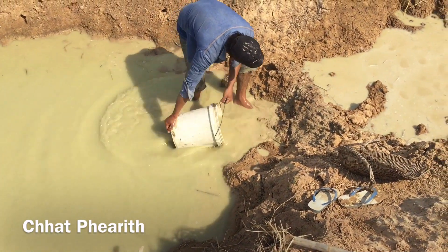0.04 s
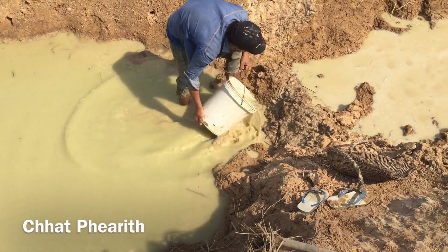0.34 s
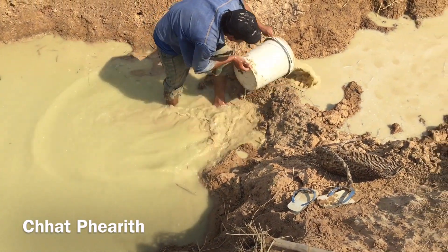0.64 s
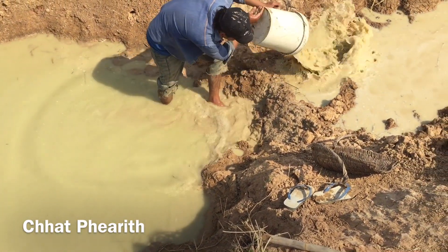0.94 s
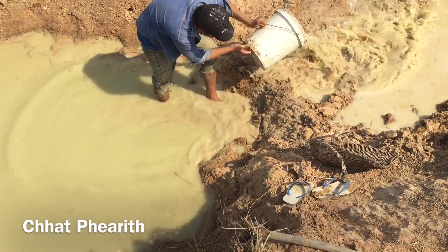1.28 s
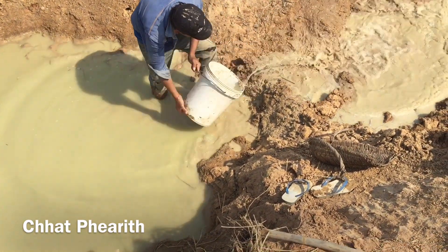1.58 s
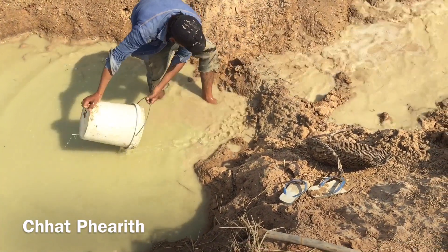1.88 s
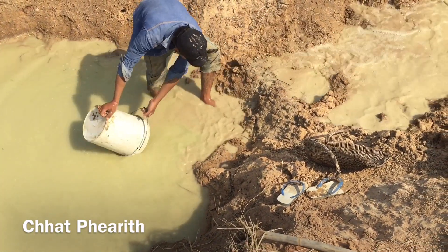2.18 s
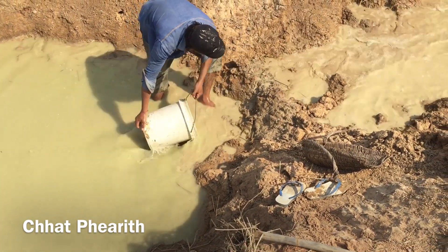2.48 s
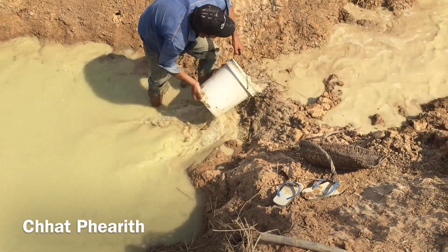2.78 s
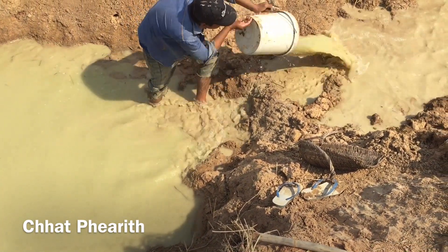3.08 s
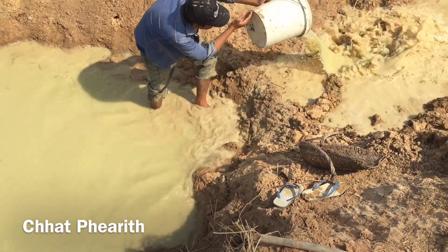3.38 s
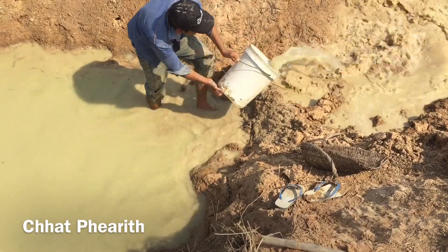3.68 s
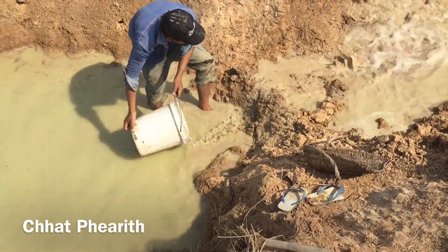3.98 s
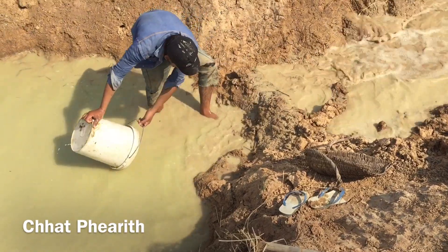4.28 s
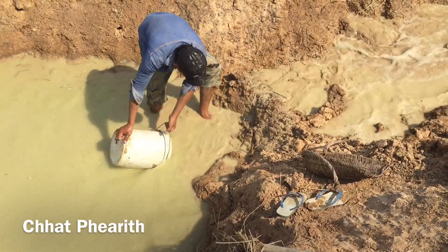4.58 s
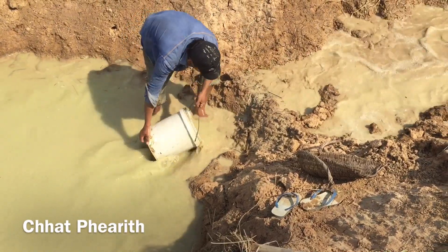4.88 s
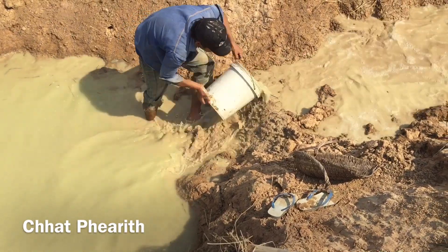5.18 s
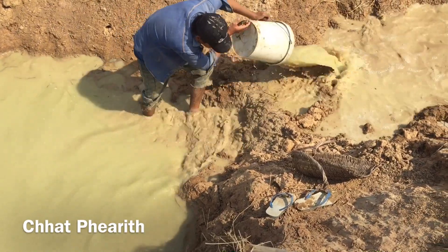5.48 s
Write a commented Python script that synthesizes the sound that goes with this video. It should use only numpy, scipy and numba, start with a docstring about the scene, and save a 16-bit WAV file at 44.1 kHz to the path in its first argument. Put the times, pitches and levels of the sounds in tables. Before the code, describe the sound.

A plastic bucket slaps into shallow muddy water with a knock right at the start and fills with a hollow, gulping slosh. At about 0.8 seconds the load is flung over a bank and lands in two quick splashes, a deep gurgle with slosh and spray that thins to a dribble by 2 seconds. Near 2.4 seconds the bucket knocks in again with a low gulp of trapped air and fills. The second load splashes down from 3 to 3.6 seconds, followed by small slaps and dribbles. A third scoop sloshes from about 4.6 to 5.3 seconds, and its load lands around 5.5 seconds, at the very end. Drips and small waves continue throughout, with a short, weak echo from the earth banks. Behind it all, light wind bumps and rumbles softly on the microphone over faint outdoor air.

```python
"""Muddy water sloshes and splashes as a plastic bucket bails a shallow pond, three times over.
The bucket slaps in and fills with hollow gulps of air; its wall knocks on the first and second dips.
Each load is flung over a bank and lands as a cloud of ringing bubbles (deep gurgle, slosh and
spray) that thins to a dribble. Drips fall throughout and the banks return a short echo.
Behind it all, light wind nudges the microphone over faint outdoor air."""
import sys
import numpy as np
from scipy import signal
from scipy.fft import rfft, irfft
from scipy.io import wavfile
from scipy.ndimage import uniform_filter1d
from numba import njit

SR = 44100
rng = np.random.default_rng(int(sys.argv[2]) if len(sys.argv) > 2 else 0)


def materialize(psi):
    """Save the field psi as 16-bit PCM at rate SR to the path in sys.argv[1].

    A 1-D psi becomes a single channel; in a 2-D psi each row is a channel.
    """
    bounded = np.clip(np.atleast_2d(psi).T, -1, 1)
    quanta = np.round(bounded * 32767).astype(np.int16)
    wavfile.write(sys.argv[1], SR, quanta)


N = 253134
T = np.arange(N) / SR

# Loads landing beyond the bank; the first comes down in two. Each row: start in seconds, rise in
# seconds, hold in seconds, level in dB, gurgle in dB against that level.
LOADS = [(.775, .075, .11, -41, -2), (1.06, .1, .17, -42.5, -7), (3.02, .31, .19, -40.5, -1.5),
         (5.35, .32, .1, -39.5, -3)]
# The bucket filling. Each row: start and end in seconds, level in dB, brightness in dB, share of
# the slosh that runs into the hollow from 0 to 1.
FILLS = [(-.02, 0.711, -55, -1.17, 0.75), (2.357, 2.93, -50.5, 0.86, 0.77), (4.591, 5.28, -51, -1, 0.66)]
# Short waves pushed by the bucket and dribbles shaken from it. Each row: start in seconds, time to
# the peak in seconds, level in dB, brightness in dB.
WAVELETS = [(.378, .055, -49.5, -3), (.52, .09, -50, -1), (.67, .08, -55, 5.5), (1.70, .08, -63, 9),
            (1.96, .035, -66, 3.5), (2.17, .06, -56, -3.5), (2.635, .11, -58, 11), (3.79, .1, -52.5, 6),
            (4.25, .08, -65, 4), (4.43, .06, -67, 2), (4.53, .075, -55.5, -4), (4.605, .03, -49.5, 0),
            (4.853, .043, -50, 3.5), (5.14, .05, -43, 0)]
# The tone of the bubble clouds. Each row: frequency in Hz, gain in dB.
BUBBLE_EQ = [(220, -1.5), (320, -3), (420, -1), (550, -5), (700, -2.5), (950, -1), (1300, -1), (2400, 0.5),
             (3500, 2), (4500, 1), (6500, 0.5), (8000, 3.5), (9800, -5.5)]
# The hollow tone inside the bucket. Each row: frequency in Hz, gain in dB.
HOLLOW_EQ = [(600, 5.5), (740, 8.5), (900, 0), (1080, -6), (1450, -4), (1750, 9.5), (1930, -1),
             (2150, -2.5), (2450, -6.5)]
# The bucket's first knock (two rows), then ringing air pockets and drips. Each row: start in
# seconds, pitch in Hz, peak in dB, cycles to the peak.
RINGS = [(.0675, 1674, -30.5, 4.9), (.071, 774, -34, 1.8), (.11, 327, -46, 2.5), (.433, 183, -40, 1.2),
         (.899, 329, -44, 4.8), (.934, 292, -36, 2.4), (.972, 161, -41.5, 1.5), (1.034, 388, -37.5, 2.1),
         (2.3, 1560, -46, 4.2), (2.492, 616, -41.5, 3.9), (2.5495, 2450, -37.5, 2.4),
         (2.614, 1590, -38.5, 5.2), (3.069, 333, -29.5, 0.38), (3.244, 273, -32.5, 1.3),
         (3.268, 320, -30.5, 2.5), (3.344, 302, -28.5, 2.8), (3.869, 334, -38, 0.48),
         (4.038, 1294, -45, 3.7), (4.249, 318, -51, 1.1), (4.652, 3700, -31, 1.4),
         (4.688, 150.5, -40.5, 1.6), (4.730, 650, -29.5, 1.3), (4.744, 386, -38, 2.3),
         (4.971, 3700, -27, 2.8), (5.030, 303, -29.5, 0.8), (5.062, 680, -35, 1.6), (5.147, 1940, -31, 1.8),
         (5.235, 300, -37.5, .9), (5.564, 339, -28.5, 0.94), (5.588, 340, -35.5, 2), (5.656, 316, -32, 2.2),
         (5.675, 315, -27, 1.3), (5.68, 205, -33.5, 1.4)]
# Air caught under the bucket on its second dip. Each row: pitch in Hz, peak in dB, time to the peak
# in seconds, climb in octaves over five times that time.
PLUNGE_GULPS = [(158, -26, .011, 0.086), (207, -27, 0.014, .01)]
# Slaps and falling dollops. Each row: start in seconds, level in dB, band centre in Hz, time to the
# peak in seconds.
WATER_SLAPS = [(0.0652, -38.5, 2510, 0.0035), (0.1144, -42, 1920, 0.0027), (0.3448, -42.5, 3530, 0.00099),
               (0.451, -43, 4860, 0.0045), (.537, -36.5, 3750, 0.00053), (1.826, -41, 3740, 0.0017),
               (2.389, -45, 2780, 0.0091), (2.882, -40, 1800, 0.0063), (3.349, -32.5, 790, 0.0077),
               (3.866, -36, 3000, 0.0016), (3.909, -36, 1600, 0.002), (3.921, -30.5, 2400, 0.00061),
               (3.993, -39.5, 4500, .003), (4.335, -48.5, 3120, .0013), (4.442, -51.5, 3670, 0.0068),
               (4.518, -42.5, 3200, 0.00027), (4.554, -49, 3400, 0.0018), (4.623, -39, 2000, 0.0038),
               (4.729, -44.5, 830, 0.0032), (5.128, -32.5, 3650, 0.00059), (5.146, -27, 1940, .0006),
               (5.172, -32.5, 4480, 0.0021), (5.177, -34.5, 1510, 0.0049)]
# The wall's second knock. Each row: pitch in Hz, relative level in dB, seconds to fall by 60 dB.
WALL_MODES = [(755, 1.5, 0.081), (960, 6, 0.024), (1100, -3, 0.044), (1480, -6, .03), (1860, -17, 0.084),
              (3280, -9, 0.051)]
# The wind's push on the microphone. Each row: time in seconds, level in dB before gusts.
WIND_LEVELS = [(0.0, -67), (0.1, -59), (0.25, -74), (0.65, -78), (1.2, -68), (1.38, -54), (1.55, -62),
               (2.2, -62), (2.75, -59.5), (3.15, -52.5), (3.7, -56), (4.3, -54), (4.7, -60), (4.85, -61.5),
               (5.25, -62.5), (5.5, -49), (5.74, -55.5)]
# The strongest soft bumps of air. Each row: start in seconds, pitch in Hz, peak in dB.
BUFFETS = [(1.341, 105, -35.5), (1.562, 182, -43), (1.743, 163, -37.5), (1.995, 119, -42),
           (2.016, 146, -38.5), (2.326, 97, -38.5), (2.888, 129, -36), (3.118, 107, -33),
           (3.391, 76.5, -38), (3.545, 70.4, -35), (3.841, 98, -33.5), (4.1, 92, -37), (4.246, 171, -40),
           (4.286, 100, -37), (4.32, 112, -36.5), (4.515, 186, -38.5), (5.503, 103, -31.5)]
# The tone of the wind, then of still air. Each row: frequency in Hz, relative level in dB.
RUMBLE_EQ = [(15, -41), (35, -6.5), (60, 8.5), (100, 2.5), (180, -7), (300, -19.5), (600, -52.5),
             (2000, -75)]
AIR_EQ = [(30, 8), (200, 20), (500, -9), (2000, 6), (6000, -13), (10000, -21.5)]
# A resonance and notches that colour the whole mix. Each row: centre in Hz, width in Hz, gain in dB.
MIC_EQ = [(1070, 93, -3), (1630, 375, -4.5), (1984, 334, 3.5), (4890, 280, -3.5), (7780, 1170, -5.5)]

# Every trio runs gurgle, slosh, spray: the three sizes of bubble in moving water.
POUR_RISE_POWER = (1.3, .6, .6)  # slosh and spray arrive ahead of the bulk
POUR_FALL_DB_PER_S = (44, 43, 34)
FILL_BALANCE_DB, FILL_TREND_DB_PER_S = (-2.5, 0, -0.97), (-9, -4, 2)
TRICKLE_DB = (-80, -73, -74)  # water that never stops running off the bank

SECOND_KNOCK_S, PLUNGE_S = 2.3885, 2.395
DRIPS_PER_S, DRIP_HZ, DRIP_DB = 5.4, (910, 5040), -55.5
GULPS_PER_S, GULP_HZ, GULP_OVER_FILL_DB = 12, (1090, 4800), 2.5
PUFFS_PER_S, PUFF_HZ, PUFF_OVER_WIND_DB = 8, (55, 240), 7


def water(lap_db=0.66, deep_lap_db=1.63):
    """Big, middling and tiny bubbles ring in unevenly lapping water, clumping as each sheet breaks up."""
    gurgle_db, slosh_db, spray_db = stirring() + lap_db * drift(hz=14)
    gurgle_db = gurgle_db + deep_lap_db * drift(hz=7)
    clumps_db = drift(hz=53)
    gurgle = cloud(gurgle_db, 223, 667, spread_db=6, cycles=1.86, rise=0.047, froth=0.33, count=1500)
    slosh = cloud(slosh_db, 641.6, 2430, spread_db=2.5, cycles=2.3, rise=0.047, froth=0.7, count=4500)
    spray = cloud(spray_db, 2530, 9120, spread_db=4.5, cycles=2.9, rise=0.022, froth=1.39, count=16000)
    gurgle = steadied(gurgle) * gain_of(gurgle_db + 1.6)
    slosh = steadied(in_bucket(slosh) * gain_of(0.94 * clumps_db)) * gain_of(slosh_db + 0.57)
    spray = steadied(spray * gain_of(clumps_db)) * gain_of(spray_db + 0.92)
    return gurgle + slosh + spray


def stirring():
    """Envelopes in dB for gurgle, slosh and spray: all movements of the water add in power."""
    moves = [pour(*row) for row in LOADS]
    moves += [fill(*row[:-1]) for row in FILLS]
    moves += [swash(*row) for row in WAVELETS]
    power = sum(np.square(move) for move in moves)
    return 10 * np.log10(power + gain_of(TRICKLE_DB)[:, None] ** 2)


def pour(start, rise_s, hold_s, db, gurgle_db):
    """A load lands, keeps coming, then runs off; the gurgle fades as soon as the bulk is down."""
    landed = np.clip((T - start) / rise_s, 1e-9, 1)
    layers = zip((db + gurgle_db, db, db), (0, hold_s, hold_s), POUR_RISE_POWER, POUR_FALL_DB_PER_S)
    return [landed ** power * gain_of(level - fall * np.maximum(T - start - rise_s - held, 0))
            for level, held, power, fall in layers]


def fill(start, end, db, bright_db, attack_s=.05, fall_db_per_s=65):
    """Water runs into the bucket, gurgle fading and spray growing, until it is lifted clear."""
    attack = np.clip((T - start) / attack_s, 0, 1)
    envelope = attack * gain_of(db - fall_db_per_s * np.maximum(T - end, 0))
    from_middle = np.clip(T, start, end) - (start + end) / 2
    layers = zip(FILL_BALANCE_DB, (-bright_db, 0, bright_db), FILL_TREND_DB_PER_S)
    return [envelope * gain_of(level + tilt + trend * from_middle) for level, tilt, trend in layers]


def swash(start, peak_s, db, bright_db, gurgle_db=-10):
    """A small wave swells and subsides."""
    u = np.maximum(T - start, 0) / peak_s
    envelope = (u * np.exp(1 - u)) ** 2
    return [envelope * gain_of(db + tilt) for tilt in (gurgle_db - bright_db, 0, bright_db)]


def cloud(level_db, lo_hz, hi_hz, spread_db, cycles, rise, froth, count):
    """A band of bubbles; harder stirring makes more and whips up a froth of countless tiny ones."""
    stir = gain_of(level_db - level_db.max())
    birth_rate = stir ** .4
    when, pitch, strength, damping, lift, sign = rng.random((count, 6)).T
    starts = np.minimum(np.searchsorted(np.cumsum(birth_rate), when * birth_rate.sum()), N - 1)
    hz = lo_hz * (hi_hz / lo_hz) ** pitch
    accent_db = spread_db * np.minimum(-np.log(1 - strength), 4)
    # Small bubbles die sooner, so the root of the pitch gives all sizes a like energy.
    gains = gain_of(accent_db) * np.sqrt(hz) * np.sign(sign - .5)
    rings = bubbles(starts, hz, cycles * 2 ** (2 * damping - 1), rise * lift, gains)
    f = np.fft.rfftfreq(N, 1 / SR) + 1
    pink_band = 1 / np.sqrt(f * (1 + (lo_hz / f) ** 12) * (1 + (f / hi_hz) ** 12))
    foam = unit_rms(irfft(rfft(rng.standard_normal(N)) * pink_band, N))
    return equalised(unit_rms(rings / np.sqrt(birth_rate)) + froth * stir ** 0.16 * foam, BUBBLE_EQ)


@njit
def bubbles(starts, hz, cycles, rise, gains):
    """Each freshly closed bubble is a dying sine whose pitch climbs as it nears the surface."""
    out = np.zeros(N)
    for k in range(len(starts)):
        life = cycles[k] * SR / hz[k]
        fade, step = 1., np.exp(-1 / life)
        for i in range(min(int(5 * life), N - starts[k])):
            u = i / life
            turns = cycles[k] * u * (1 + rise[k] * u / 2)
            out[starts[k] + i] += gains[k] * fade * (1 - fade * fade) * np.sin(2 * np.pi * turns)
            fade *= step
    return out


def in_bucket(x):
    """Water that runs into the bucket takes on its hollow colour."""
    inside = sum(share * ((T > start) & (T < end)) for start, end, _, _, share in FILLS)
    inside = uniform_filter1d(inside, size=2500)
    return (1 - inside) * x + inside * equalised(x, HOLLOW_EQ)


def first_knock_and_pockets(climb_octaves=.35, full_climb_below_hz=400):
    """The bucket's first knock, trapped air pockets and drips all ring; high pitches climb less."""
    out = np.zeros(N)
    rows = list(RINGS) + strays(0, T[-1], DRIPS_PER_S, DRIP_HZ, DRIP_DB)
    for start, end, db, _, _ in FILLS:
        rows += strays(start, end, GULPS_PER_S, GULP_HZ, db + GULP_OVER_FILL_DB)
    for start, hz, db, cycles in rows:
        octaves = climb_octaves * min(full_climb_below_hz / hz, 1)
        add(out, start, rising_ring(hz, db, cycles / hz, octaves))
    for row in PLUNGE_GULPS:
        add(out, PLUNGE_S, rising_ring(*row))
    return out


def rising_ring(hz, db, peak_s, octaves):
    """One resonance swells and dies while its pitch climbs."""
    u, envelope = swell(peak_s)
    turns = np.cumsum(hz * 2 ** (octaves * u / 5)) / SR
    return gain_of(db) * envelope * np.sin(2 * np.pi * turns)


def slaps(width_octaves=0.68, samples=2 ** 13):
    """Flat lumps of water land, each a short, broad burst of noise."""
    out = np.zeros(N)
    f = np.fft.rfftfreq(samples, 1 / SR)
    for start, db, hz, peak_s in WATER_SLAPS:
        _, envelope = swell(peak_s)
        band = 1 / (1 + (np.log2((f + 1) / hz) / width_octaves) ** 2)
        burst = steadied(irfft(rfft(rng.standard_normal(samples)) * band), window=120)
        add(out, start, gain_of(db) * envelope * np.resize(burst, len(envelope)))
    return out


def second_knock(gain_db=-33, contact_s=0.00091):
    """The plastic wall meets the surface, rings, and is quickly damped by the water."""
    t, out = T[:SR // 4], np.zeros(N)
    ring = sum(gain_of(db - 60 * t / t60) * np.sin(2 * np.pi * hz * t) for hz, db, t60 in WALL_MODES)
    add(out, SECOND_KNOCK_S, gain_of(gain_db) * ring * (1 - np.exp(-t / contact_s)))
    return out


def banks(x, t60=.13, echo_db=-12, taps_per_s=2000, predelay_s=.004):
    """The earth banks scatter a short, weak echo."""
    t = T[:SR // 5]
    taps = rng.standard_normal(len(t)) * (rng.random(len(t)) < taps_per_s / SR)
    taps *= (t > predelay_s) * gain_of(-60 * t / t60)
    return x + gain_of(echo_db) * signal.oaconvolve(x, taps / np.linalg.norm(taps))[:N]


def wind(lump_db=3.3, gust_db=3, trim_db=0.8, bump_cycles=0.6):
    """Wind on the microphone: a lumpy, gusting rumble with soft buffets and lesser random puffs."""
    lumpy_noise = rng.standard_normal(N) * gain_of(lump_db * drift(hz=28))
    rumble = steadied(equalised(lumpy_noise, RUMBLE_EQ), window=3000)
    strength_db = np.interp(T, *np.transpose(WIND_LEVELS))
    out = rumble * gain_of(strength_db + trim_db + gust_db * drift(hz=8.9))
    puffs = [(start, hz, db + np.interp(start, T, strength_db))
             for start, hz, db, _ in strays(0, T[-1], PUFFS_PER_S, PUFF_HZ, PUFF_OVER_WIND_DB)]
    for start, hz, db in list(BUFFETS) + puffs:
        u, envelope = swell(bump_cycles / hz)
        tone = np.sin(2 * np.pi * (bump_cycles * u + rng.random()))
        add(out, start, gain_of(db) * envelope ** 2 * tone)
    return out


def outdoor_air(db=-68):
    """A faint, steady bed of still air."""
    return gain_of(db) * unit_rms(equalised(rng.standard_normal(N), AIR_EQ))


def strays(start, end, per_s, hz_range, floor_db, spread_db=6, cycles=2.4):
    """Small events at random moments between start and end, in rows like those of RINGS."""
    lo_hz, hi_hz = hz_range
    waits, pitches, sizes = rng.random((64, 3)).T
    times = start + np.cumsum(2 * waits) / per_s
    return [(time, lo_hz * (hi_hz / lo_hz) ** pitch, floor_db + spread_db * size, cycles)
            for time, pitch, size in zip(times, pitches, sizes) if time < end]


def swell(peak_s):
    """Time in units of peak_s, and an envelope that rises to 1 at peak_s and dies away."""
    u = np.arange(0, 9, 1 / (peak_s * SR))
    return u, u * np.exp(1 - u)


def drift(hz):
    """A random wobble of rms 1, rolling off above hz."""
    f = np.fft.rfftfreq(N, 1 / SR)
    return unit_rms(irfft(rfft(rng.standard_normal(N)) / (1 + (f / hz) ** 4), N))


def steadied(x, window=1900):
    """Rides the level to 1 over a window of samples and leaves the fine grain."""
    power = uniform_filter1d(uniform_filter1d(x ** 2, window), window)
    return x / np.sqrt(abs(power) + 1e-3 * np.mean(x ** 2) + 1e-20)


def equalised(x, points):
    """Applies an EQ curve drawn through the points on a log-frequency axis."""
    hz, db = np.transpose(points)
    f = np.fft.rfftfreq(len(x), 1 / SR)
    curve_db = np.interp(np.log(f + 1), np.log(hz + 1), db)
    return irfft(rfft(x) * gain_of(curve_db), len(x))


def add(mix, start, sound):
    """Mixes a sound in at start seconds."""
    part = mix[max(round(start * SR), 0):][:len(sound)]
    part += sound[:len(part)]


def gain_of(db):
    """Decibels to amplitude."""
    return 10 ** (np.asarray(db) / 20)


def unit_rms(x):
    """Scales to rms 1."""
    return x / np.sqrt(np.mean(x ** 2) + 1e-20)


def scene():
    """Water and bucket between the banks, with wind and air behind them, in mono."""
    bailing = water() + first_knock_and_pockets() + slaps() + second_knock()
    return (banks(bailing) + wind() + outdoor_air())[None]


def record(dry):
    """The microphone and its surroundings colour the mix; a steep low-pass takes off the top."""
    f = np.fft.rfftfreq(N, 1 / SR)
    colour_db = sum(db / (1 + (2 * (f - hz) / width) ** 4) for hz, width, db in MIC_EQ)
    coloured = irfft(rfft(dry[0]) * gain_of(colour_db), N)
    lowpass = signal.firwin(1023, cutoff=9850, window=("kaiser", 9), fs=SR)
    return signal.oaconvolve(coloured, lowpass, "same")[None]


dry = scene()
out = record(dry)
materialize(out)
```